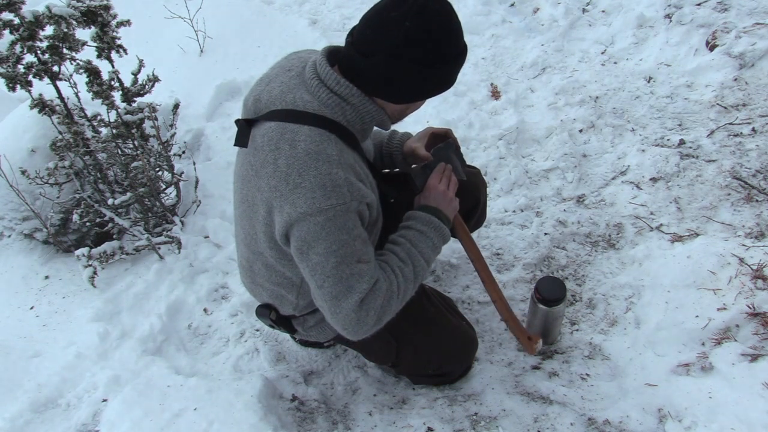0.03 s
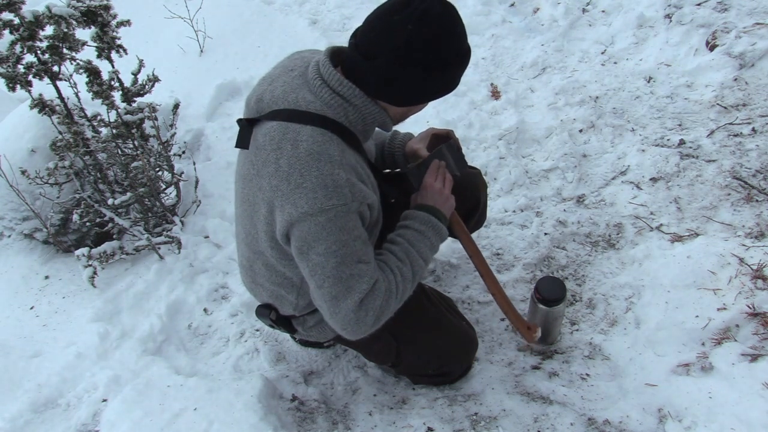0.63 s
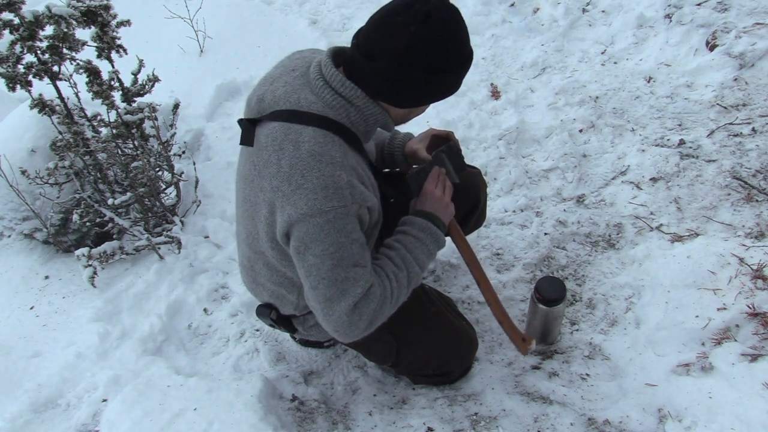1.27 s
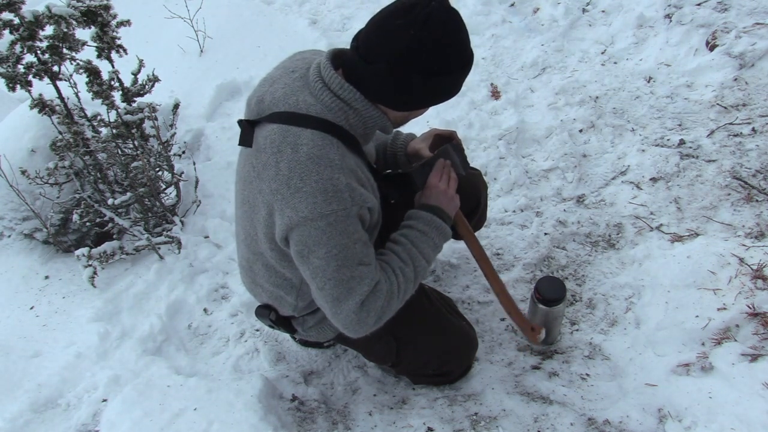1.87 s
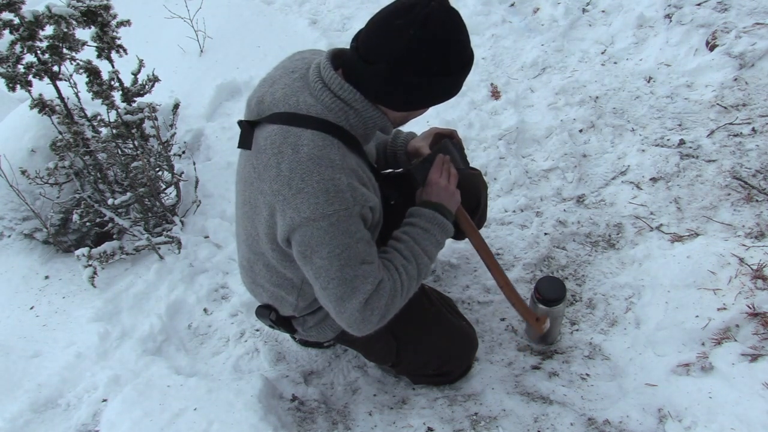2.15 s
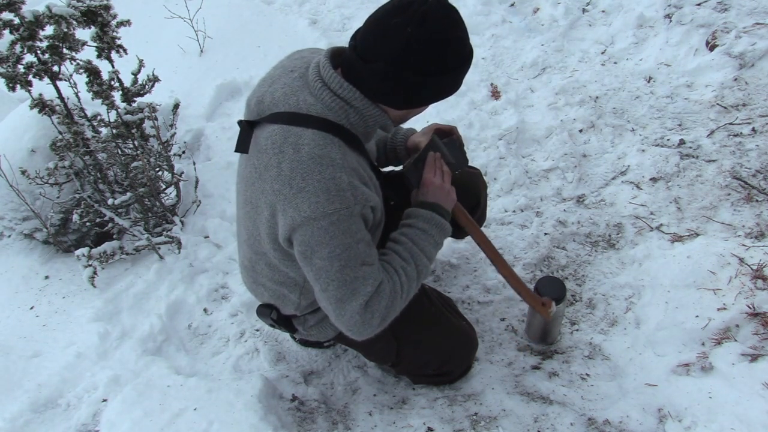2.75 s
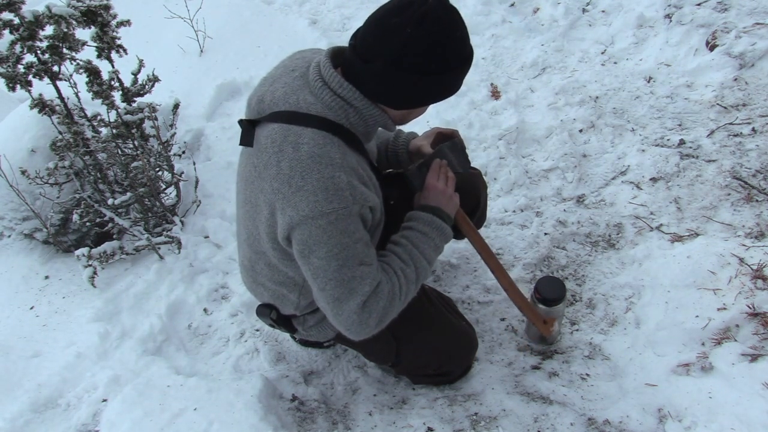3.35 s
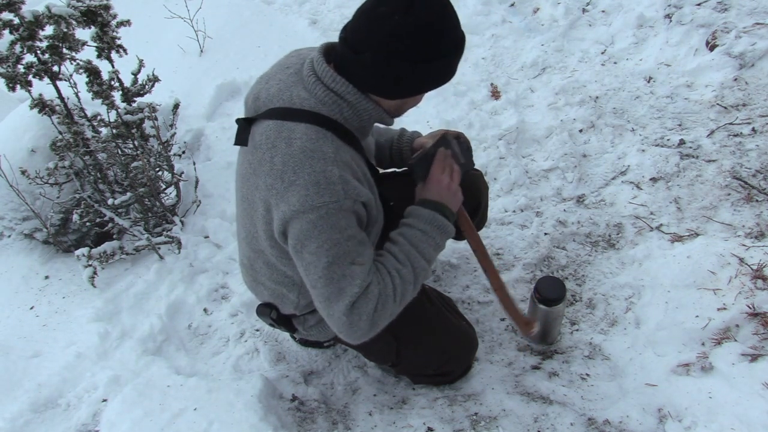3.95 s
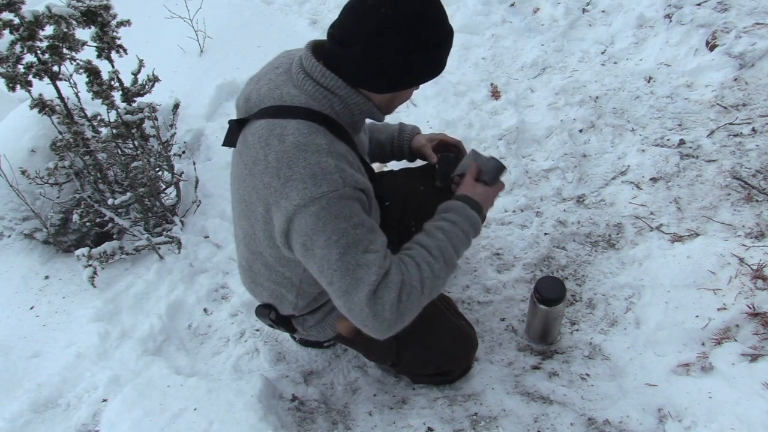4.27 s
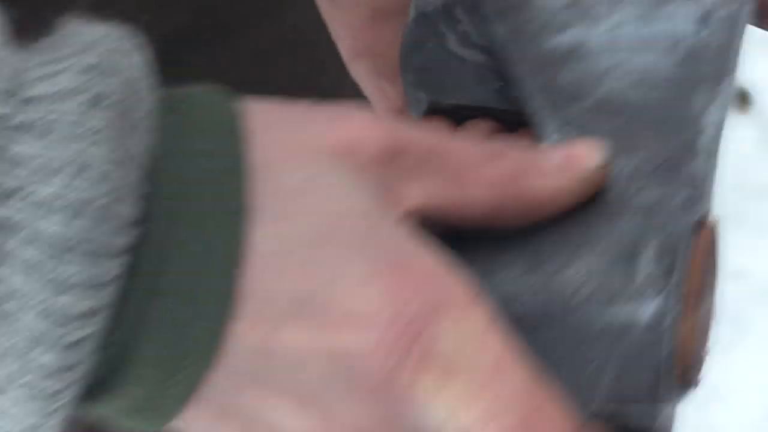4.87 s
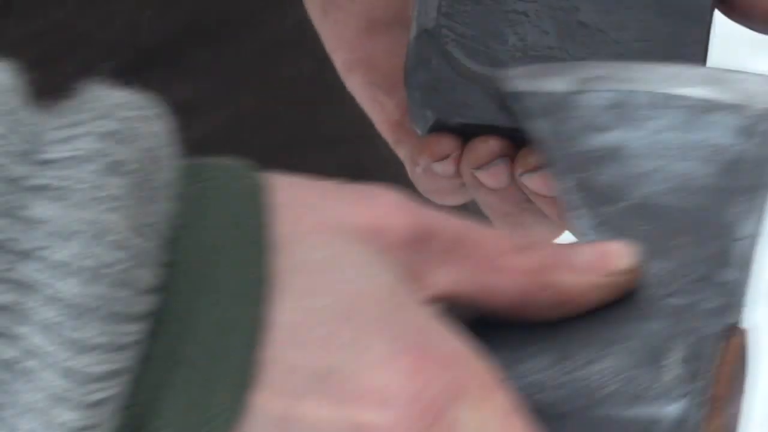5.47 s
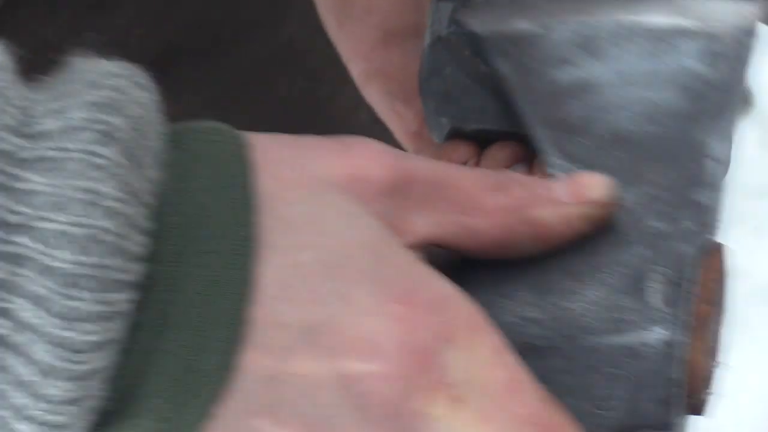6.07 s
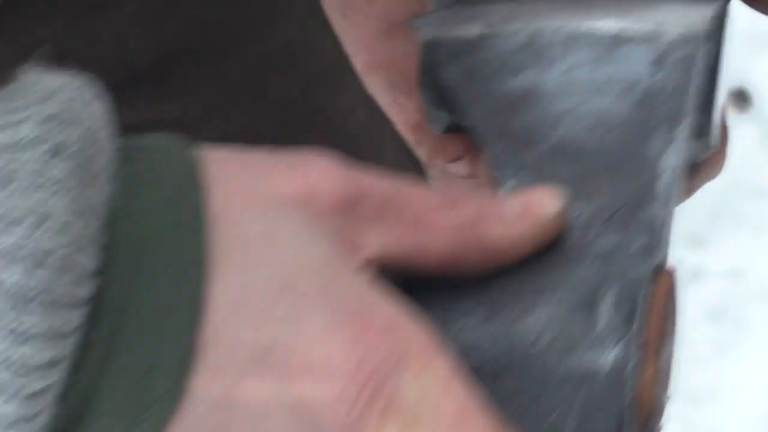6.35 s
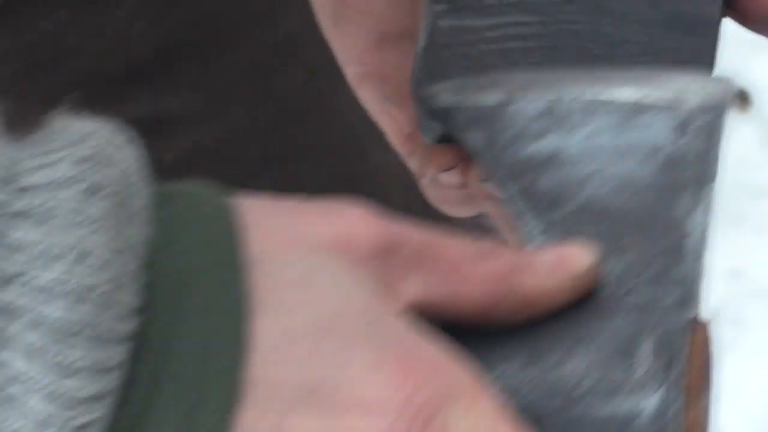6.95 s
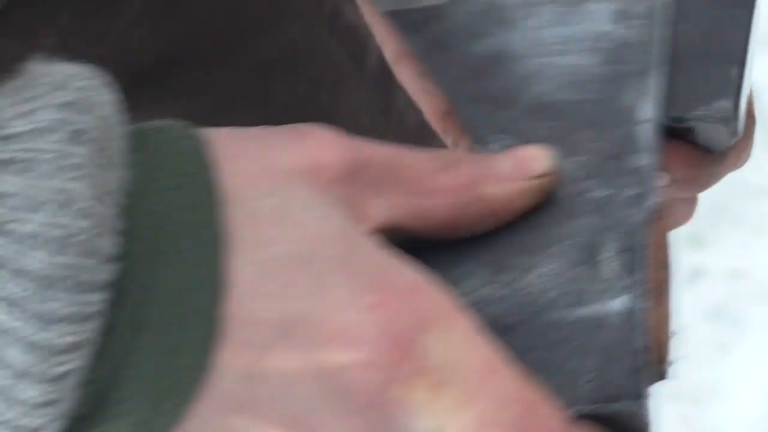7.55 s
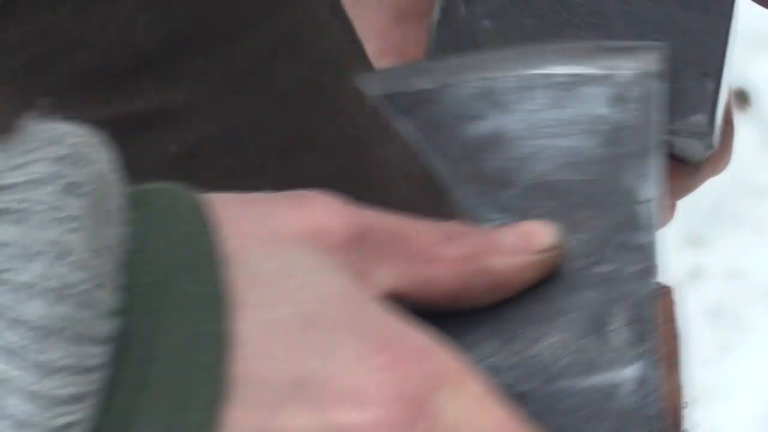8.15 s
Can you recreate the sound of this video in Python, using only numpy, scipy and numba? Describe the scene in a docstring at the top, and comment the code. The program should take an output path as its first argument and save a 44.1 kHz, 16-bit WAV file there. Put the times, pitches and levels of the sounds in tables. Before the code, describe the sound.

In quiet, snowy open air, an axe is honed close to the microphone. A stone rasps back and forth over the steel in a fast, even rhythm, with grains sometimes catching on the edge. The scraping stops with a small metallic ring, followed by a soft cloth rustle and a few light finger taps. Then a second run of rapid scraping begins, slightly different in tone, and continues to the end.

```python
"""In still, snowy air a kneeling man hones an axe with a small stone, pushing and pulling it in flat
circles at about eight strokes a second. Grit catches on the bevel and shakes the steel head, whose
tones are damped and bent by the stone pressed on it. Near 3.9 s the stone lifts off and the head rings.
The axe is turned over with a rustle and a few finger taps. From about 4.6 s the other face is honed."""
import sys
import numpy as np
from scipy import signal
from scipy.fft import rfft, irfft, next_fast_len
from scipy.io import wavfile
from numba import njit

SR = 44100
rng = np.random.default_rng(int(sys.argv[2]) if len(sys.argv) > 2 else 0)


def to_wav(s):
    """Save 16-bit WAV."""
    ch = np.atleast_2d(s).T  # columns
    pcm = np.round(np.clip(ch, -1, 1) * 32767)  # PCM
    wavfile.write(sys.argv[1], SR, pcm.astype(np.int16))


N = 362493
TIME = np.arange(N) / SR

# Strokes on each face, push and pull in turn. "Place" is where the stone sits across the bevel.
# (middle time [s], relative level [dB], swell length [s], place [-1..1])
FIRST_FACE_STROKES = [(.055, -33.5, 0.053, 0.34), (.168, -35.5, 0.058, -0.31), (.341, -32.5, 0.07, 0.24),
                      (.465, -37, .06, -0.3), (.607, -32.5, 0.059, 0.28), (.719, -37, 0.077, -0.31),
                      (.885, -34, 0.073, 0.29), (1.008, -37.5, 0.063, -0.39), (1.14, -35, 0.067, 0.34),
                      (1.253, -36, 0.044, -0.39), (1.386, -37, 0.06, -0.12), (1.523, -38.5, 0.088, -0.14),
                      (1.654, -35.5, 0.053, -0.056), (1.776, -34.5, 0.05, -0.063),
                      (1.906, -39, 0.064, -0.32), (2.029, -39, .064, -0.063), (2.166, -35.5, .058, -0.31),
                      (2.302, -34.5, 0.057, 0.055), (2.424, -35, 0.04, -0.17), (2.554, -37, 0.06, -0.018),
                      (2.672, -37, 0.061, -0.24), (2.801, -32.5, .045, 0.14), (2.926, -39, 0.051, -0.077),
                      (3.055, -35, 0.058, 0.15), (3.169, -36, 0.046, -0.28), (3.311, -32.5, 0.051, 0.072),
                      (3.436, -35, 0.059, -0.28), (3.566, -33.5, 0.03, 0.13), (3.68, -38.5, 0.061, -0.21),
                      (3.848, -34, 0.079, -0.043)]
SECOND_FACE_STROKES = [(4.66, -40, 0.15, -0.49), (4.785, -41, 0.035, 0.62), (4.878, -42.5, 0.047, -0.6),
                       (5.005, -39, 0.13, 0.73), (5.148, -38, 0.043, -0.79), (5.265, -39, 0.051, -0.14),
                       (5.39, -45, .04, -0.071), (5.495, -38.5, 0.16, 0.42), (5.64, -41.5, .042, -.5),
                       (5.752, -38, 0.11, 0.27), (5.88, -41, 0.035, -0.6), (5.98, -38, 0.13, 0.28),
                       (6.137, -39, 0.074, -0.33), (6.245, -36.5, 0.11, 0.19), (6.378, -37, 0.082, -0.042),
                       (6.493, -34, 0.084, -0.079), (6.615, -36, 0.063, -.05), (6.728, -35, 0.062, 0.099),
                       (6.863, -32.5, 0.094, -0.052), (7.005, -37, 0.091, -0.08),
                       (7.126, -32.5, 0.075, 0.032), (7.255, -37, 0.057, 0.013),
                       (7.374, -32.5, 0.059, 0.34), (7.499, -34.5, 0.067, -0.047),
                       (7.614, -32.5, 0.039, 0.4), (7.744, -35.5, 0.097, 0.12), (7.863, -36, 0.047, 0.45),
                       (7.985, -38, 0.1, -0.032), (8.118, -40.5, 0.26, 0.53), (8.218, -36, 0.048, -0.19)]
# Tones of the head under the stone: (pitch [Hz], width [Hz], gain [dB], gain per unit of place [dB],
# gain along the edge [dB], bend per unit of place [log ratio], bend along the edge [log ratio])
FIRST_HEAD_TONES = [(416, 110, -26.5, -2, -7.5, 0.066, -0.043), (1051.4, 63, -14.5, 1, 4, 0.073, 0.037),
                    (1230, 1600, -16.5, 0, -1.5, -0.18, 0.12), (1877, 146, -15, -14, 1, 0.0097, -0.0045),
                    (2248, 82, -10.5, 8.5, -3.5, -0.19, 0.0049), (2780, 190, -12, 13, 6, 0.19, 0.01),
                    (3233, 394, -0.5, 15, -3, -0.021, -0.028), (3563, 385, -7.5, 20, -3.5, -0.07, 0.08),
                    (4190, 320, -21.5, 17, 8.5, -0.055, 0.0078), (5380, 570, -28, -1, 13.5, -0.016, 0.057),
                    (5980, 260, -15, -4.5, -6, 0.064, -0.02), (6410, 350, -15, -23.5, -5.5, -0.15, -0.014),
                    (7830, 710, -19, 7, -2.7, -0.033, -0.036), (10870, 1100, -24, -6, -18.5, 0.023, -0.11),
                    (11000, 11700, -27, 7, 10, -0.3, -0.051), (12700, 770, -30, 2, -2, -0.029, -0.058)]
SECOND_HEAD_TONES = [(440, 430, -35, -6.5, 4, -0.01, 0.091), (1102, 107, -7, -5, -10, 0.0092, -0.04),
                     (1372, 270, -18, 1, -14, -0.063, 0.079), (1997, 148, -4.5, -5, -9, 0.014, -0.091),
                     (2071, 240, -2, 1, -6, -0.048, 0.088), (2733, 410, 0, -7.5, -10.5, -0.036, -0.04),
                     (3166, 590, -17.5, 12, 13.5, 0.037, 0.03), (3582, 127, -19, 19, 12.5, 0.011, -0.0024),
                     (3857, 205.0, -16, 16, 2, 0.023, 0.011), (4424, 590, -11.5, 9, -12, 0.008, -0.037),
                     (6050, 860, -14.5, 5, 1, -0.056, -0.082), (7010, 270, -23, -11, 4.5, 0.043, -0.11),
                     (7420, 790, -15.5, 1, -5, 0.072, 0.047), (11000, 7400, -16.5, 6, -6.5, -0.19, 0.11),
                     (13350, 1100, -23.5, 3, -11, 0.06, -0.095)]
# Whines that swell and glide as the stone slides out and back; a cycle runs from mid-push to mid-push.
# (pitch [Hz], width [Hz], gain [dB], gain along the edge [dB], bend along the edge [log ratio],
# pitch swing [log ratio], highest at [cycles], swell [dB], loudest at [cycles])
FIRST_FACE_WHINES = [(2506, 110, -13.5, 2, -0.033, 0.046, 0.28, 6.5, 0.69),
                     (2213, 91, -11.5, -23, 0, 0.028, .05, 7.5, 0.0195),
                     (2758, 100, -16, 3.5, -0.0011, .085, .3, 8, 0.52),
                     (530.5, 34, -26.5, 2.5, -0.0082, 0.017, 0.24, 1.5, .45),
                     (5950, 160, -30, 6, -.04, .025, 0.91, 4, 0.29),
                     (6600, 93, -18, -6, -.005, 0.022, 0.24, 5, 0.3),
                     (7810, 140, -21, 2, -0.0032, .02, 0.89, 2, 1),
                     (10820, 180, -28, -1.5, -.07, .03, 0.98, 3.5, 0.098),
                     (12750, 250, -30.5, 2, -0.036, 0.032, 0.88, 0, 0.99)]
SECOND_FACE_WHINES = [(1065, 65, -31.5, 14.5, -0.033, .02, 0.23, 7.9, 0.032),
                      (2736, 84, -5, -7.5, 0.0031, .01, 0.48, 2.6, 0.88),
                      (2557, 90, -22, 17.5, 0.115, 0.06, 0.253, 6.4, 0.58),
                      (3984, 190, -16.5, -8, .02, .03, .55, 5, 0.33),
                      (5940, 220, -23, 9.5, 0.049, 0.042, 0.554, 3.8, 0.64),
                      (6990, 170, -18, -16, 0.0055, 0.023, .35, 6.1, 0.6),
                      (7760, 200, -38.5, 15, 0.032, 0.04, 0.07, 4, 0.21),
                      (10800, 300, -35, 5.5, 0, 0.031, 0.79, 6.5, 0.57),
                      (13330, 450, -26.5, -5, -.07, .03, 0.88, 4, 0.6)]
# How the stone is held: (time [s], circle radius [units of place], stone pitch [Hz],
# pitch swing [log ratio], gain on pushes [dB], gain on pulls [dB])
FIRST_FACE_GRIP = [(0, 0.11, 628, 0.21, -19.5, -14), (1.0, 0.08, 634, 0.13, -17, -13.5),
                   (2.0, 0.01, 597, 0.27, -21.5, -12), (2.8, 0.05, 526, 0.19, -22.5, -11.5),
                   (3.55, 0.09, 520, .3, -23, -9.5), (3.86, 0.6, 430, 0.28, -29, -11.5)]
SECOND_FACE_GRIP = [(4.63, .25, 464, 0.24, -13.5, -26.5), (5.9, 0.18, 470, .24, -14.5, -26.5),
                    (6.4, .1, 582, .14, -26, -27), (7.0, 0.25, 730, 0.19, -25.5, -25),
                    (7.5, 0.18, 860, 0.15, -25, -18), (8.2, 0.19, 700, 0.15, -24.5, -17)]
# Coarse grains snag on the edge: (time [s], extra force [dB])
GRAIN_SNAGS = [(.043, 2), (0.309, 4), (0.409, 5), (.602, 1), (0.88, 2), (1.134, 5.5), (1.493, 7),
               (2.776, 4), (3.181, 3), (3.246, 10.5), (3.289, 8.5), (3.501, 13), (3.521, 10.5),
               (3.756, 5.5), (4.953, 0), (6.998, 2.5)]
# The stone loses its bite for a moment: (time [s], loss [dB])
STONE_SKIPS = [(2.762, -0.5), (3.23, -1), (3.274, 2), (3.488, 5), (3.737, 6.5), (5.088, 8.5), (5.333, 7.5),
               (5.828, 7), (6.785, 3), (6.95, 8), (7.136, 5.5), (7.436, 8.5), (7.679, 5)]
# The stone drags at the end of a stroke: (time [s], relative level [dB], pitch [Hz])
STONE_DRAGS = [(0.18, -42.5, 1520), (0.71, -46.5, 1390), (1.41, -49, 1400), (1.65, -38.5, 1400),
               (1.91, -53, 1400), (2.17, -44, 1300), (2.425, -46, 1308), (2.69, -47, 1370),
               (3.2, -46, 1396), (3.46, -40.5, 1300), (3.71, -49, 1300), (3.77, -42.5, 1950)]
# Tones of the head ringing free: (pitch [Hz], level [dB], time to fade by 60 dB [s])
FREE_HEAD_TONES = [(334, -54, 0.33), (1050, -46.5, 0.1), (1810, -38.5, 0.081), (2640, -44, 0.11),
                   (3100, -32.5, .05), (6420, -47, 0.11)]
# Sleeves rub as the axe is turned: (time [s], level [dB])
RUSTLE_LEVELS = [(3.95, -99), (4.09, -77), (4.14, -71), (4.28, -68.5), (4.34, -61.5), (4.37, -68),
                 (4.43, -67), (4.47, -61.5), (4.53, -66.5), (4.59, -72), (4.66, -59), (4.9, -72)]
# The tone colour of rubbing cloth: (frequency [Hz], relative level [dB])
CLOTH_COLOUR = [(120, -38), (200, -4), (248, -18), (320, -9), (383, -8.5), (734, -9.5), (1570, -9.5),
                (3350, -4), (4810, -17.5), (15000, -37)]
# Fingers bump the axe: (time [s], level [dB], pitch [Hz], width [Hz], time to fade by 60 dB [s])
FINGER_TAPS = [(4.175, -68, 1050, 200, .1), (4.229, -64, 3500, 4000, .04), (4.241, -58, 170, 300, 0.054),
               (4.393, -53.5, 2800, 4000, 0.027), (4.456, -50, 1010, 900, 0.035),
               (4.471, -65, 1800, 3000, .03), (4.541, -59, 3500, 4000, .03), (5.298, -59, 105, 160, .14),
               (5.389, -69, 75, 90, .2), (6.26, -60, 140, 130, .08)]
# The tone colour of the still air: (frequency [Hz], relative level [dB])
AIR_COLOUR = [(12, -32), (20, -3), (256, -11.5), (421, -17.5), (1020, -15), (2280, -21), (2690, -24),
              (2930, -32), (3180, -13), (4560, -24), (15000, -26.5)]

FIRST_CONTACT_S, SECOND_CONTACT_S = (0.0, 3.887), (4.632, 8.23)   # the stone lands, the stone leaves
LIFT_OFF_S = 3.889


def hone(motion, contact, tones, whines, impacts, stone_width_hz, release_s, wobble, tilt_db,
         overhang_hz):
    """Grit shakes the stone and the head; where they touch sets each tone's strength and pitch."""
    cycle, level_db, place, stone_hz, stone_db = motion
    start, end = contact
    touch = np.clip((TIME - start) / release_s + .5, 0, 1) * np.clip((end - TIME) / release_s + 1, 0, 1)
    out = resonate(strike(touch * impacts) * from_db(stone_db), stone_hz, stone_width_hz)   # the stone
    live = (TIME > start - .05) & (TIME < end + .1)
    along = (TIME[live] - start) / (end - start)   # the hand works its way along the edge, 0 to 1
    force = (touch * impacts * from_db(level_db))[live]
    place, cycle = place[live], cycle[live]
    crossing_s = np.exp(-.04 * wave(cycle, .9) - 0.096 * drift(13)[live]) / overhang_hz
    for hz, width, db, place_db, along_db, place_bend, along_bend in tones:
        rocking_db = tilt_db * drift(8.9)[live]
        drive = strike(force) * from_db(db + place_db * place + along_db * along + rocking_db)
        if width > 2000:
            # Broad hiss crosses the stone and returns, cancelling pitches that move with the overhang.
            drive = (drive + np.interp(TIME[live] - crossing_s, TIME[live], drive)) / np.sqrt(2)
        out[live] += resonate(drive, hz * np.exp(place_bend * place + along_bend * along), width)
    for hz, width, db, along_db, along_bend, swing, highest, swell_db, loudest in whines:
        gain = from_db(db + along_db * along + swell_db * wave(cycle, loudest))
        bend = along_bend * along + swing * wave(cycle, highest) + wobble * drift(5.2)[live]
        out[live] += resonate(strike(force) * gain, hz * np.exp(bend), width)
    return out


def hand(strokes, grip, steepness, ease_db, ease_at, stall_db, highest_at):
    """The stone goes round in flat circles; its tone glides with the overhang and fades at each turn."""
    cycle = stroke_cycle(strokes)
    level_db = scrape_level(strokes, cycle, steepness, ease_db, ease_at)
    radius, middle_hz, swing, push_db, pull_db = in_time(grip)
    times, _, _, places = np.transpose(strokes)
    reach = np.sin(2 * np.pi * cycle)
    pushing = np.cos(np.pi * cycle) ** 2
    place = np.interp(TIME, times, places) + radius * reach
    stone_hz = middle_hz * np.exp(swing * wave(cycle, highest_at))
    stone_db = level_db + pushing * push_db + (1 - pushing) * pull_db - stall_db * reach ** 4
    return cycle, level_db, place, stone_hz, stone_db


def stroke_cycle(strokes):
    """Count the hand's circles so far: a whole number at mid-push, a half at mid-pull."""
    times = np.array(strokes)[:, 0]
    times = np.r_[2 * times[0] - times[1], times, 2 * times[-1] - times[-2]]   # extend both ends
    return np.interp(TIME, times, (np.arange(len(times)) - 1) / 2)


def scrape_level(strokes, cycle, steepness, ease_db, ease_at, skip_s=0.013):
    """Each stroke swells and fades; the hand eases off once a circle, and the stone sometimes skips."""
    times = TIME[::40]
    power = sum(from_db(db) ** 2 / (1 + ((times - at) / length_s) ** 2) ** steepness
                for at, db, length_s, _ in strokes)
    lost_db = sum(db * np.exp(-((times - at) / skip_s) ** 2) for at, db in STONE_SKIPS)
    easing = np.cos(np.pi * (cycle - ease_at)) ** 16
    return np.interp(TIME, times, 10 * np.log10(power) - lost_db) - ease_db * easing


def grit(per_s, size_db, judder_db, judder_hz, sway_db):
    """Tiny grains hit at random times, harder and softer as the stone sticks and slips."""
    sizes = from_db(size_db * np.minimum(rng.exponential(1, N), 5))
    clumps = from_db(judder_db * drift(judder_hz) + sway_db * drift(12.2))
    hits = rng.random(N) < per_s / SR
    return unit_level(hits * sizes * clumps)


def snags(length_s, skate_share=0.21, skate_s=0.015):
    """The stone skates lightly, then a grain catches: the force jumps and soon eases."""
    force_db = np.zeros(N)
    for at, db in GRAIN_SNAGS:
        gap = np.abs(TIME - at)
        force_db += db * np.where(TIME >= at, np.exp(-gap / length_s), -skate_share * np.exp(-gap / skate_s))
    return from_db(force_db)


def drags(impacts, width_hz, length_s):
    """The stone drags with a short, dull rasp where a stroke runs out."""
    swell = sum(from_db(db) * np.exp(-((TIME - at) / length_s) ** 2) for at, db, _ in STONE_DRAGS)
    _, pitch_hz = in_time(STONE_DRAGS)
    return resonate(strike(impacts * swell), pitch_hz, width_hz)


def body_echo(sound, delay_s, echo_db):
    """One quick echo comes off the man's body; the snow returns nothing."""
    gain = from_db(echo_db)
    echo = gain * np.interp(TIME - delay_s, TIME, sound, left=0)
    return (sound + echo) / np.sqrt(1 + gain ** 2)


def free_ring(slip_s):
    """The head rings on as the stone slips off the edge."""
    click = signal.unit_impulse(N, round(LIFT_OFF_S * SR))
    swell = np.clip((TIME - LIFT_OFF_S) / slip_s, 0, 1)
    return swell * sum(from_db(db) * ring(click, hz, fade_s) for hz, db, fade_s in FREE_HEAD_TONES)


def handle_hum(hz, fade_s, gain_db, growth_db):
    """While the handle hangs free, the first strokes make the whole axe bend and hum."""
    stroke_db = in_time(FIRST_FACE_STROKES)[0]
    force = from_db(stroke_db + growth_db * (TIME / LIFT_OFF_S - 1.5)) * (TIME < LIFT_OFF_S)
    build_up = np.sqrt(fade_s * SR / (4 * np.log(1000)))   # how much the ringing boosts noise
    return from_db(gain_db) * ring(strike(force), hz, fade_s) / build_up


def handling():
    """Sleeves rub with a fluttering hiss, and fingers tap on the axe."""
    flutter = unit_level(from_db(2.2 * drift(90)))
    out = from_db(in_time(RUSTLE_LEVELS)[0]) * shaped_noise(CLOTH_COLOUR) * flutter
    age = np.arange(SR // 8) / SR
    for at, db, hz, width, fade_s in FINGER_TAPS:
        start = round(at * SR)
        out[start:start + len(age)] += resonate(strike(from_db(db - 60 * age / fade_s)), hz, width)
    return out


def still_air(level_db):
    """A faint, steady hush lies behind everything."""
    return from_db(level_db) * shaped_noise(AIR_COLOUR)


def strike(impacts):
    """Give every hit a random strength and direction."""
    return impacts * rng.standard_normal(len(impacts))


def resonate(sound, hz, width_hz):
    """Keep a band around one pitch; white noise comes out as strong as it went in."""
    angle = 2 * np.pi * np.clip(hz, 20, .42 * SR) / SR * np.ones(len(sound))
    tuning = np.tan(angle / 2)
    damping = 2 * np.pi * width_hz / SR / np.sin(angle)
    once = band_pass(sound + 1e-18, tuning, damping)
    return band_pass(once, tuning, damping) * np.sqrt(2 * SR / (np.pi * width_hz))


@njit
def band_pass(sound, tuning, damping):
    """A ringing filter whose pitch may move at every sample."""
    out, band, low = np.zeros(len(sound)), 0., 0.
    for i in range(len(sound)):
        step = tuning[i]
        passed = (band + step * (sound[i] - low)) / (1 + step * (step + damping[i]))
        band, low = 2 * passed - band, low + 2 * step * passed
        out[i] = damping[i] * passed
    return out


def ring(force, hz, fade_s):
    """Each click starts a pure tone that falls by 60 dB in fade_s."""
    decay, angle = from_db(-60 / (fade_s * SR)), 2 * np.pi * hz / SR
    return signal.lfilter([0, np.sin(angle)], [1, -2 * decay * np.cos(angle), decay ** 2], force + 1e-18)


def shaped_noise(colour):
    """Noise with a given tone colour and an average level of 1."""
    hz, db = np.transpose(colour)
    size = next_fast_len(N)
    log_hz = np.log(np.maximum(np.fft.rfftfreq(size, 1 / SR), 1))
    gain = from_db(np.interp(log_hz, np.log(hz), db))
    return unit_level(irfft(rfft(rng.standard_normal(size)) * gain)[:N])


def drift(rate_hz):
    """A smooth random wander, about 1 in size."""
    decay = np.exp(-2 * np.pi * rate_hz / SR)
    return unit_level(signal.lfilter([1], [1, -2 * decay, decay ** 2], rng.standard_normal(N + SR))[SR:])


def wave(cycle, peak_at):
    """Rise and fall once in each circle of the hand."""
    return np.cos(2 * np.pi * (cycle - peak_at))


def in_time(rows):
    """Join each column's values by straight lines through time."""
    times, *columns = np.transpose(rows)
    return [np.interp(TIME, times, column) for column in columns]


def from_db(db):
    """Turn decibels into a multiplier."""
    return 10 ** (np.asarray(db) / 20)


def unit_level(sound):
    """Scale to an average (rms) level of 1."""
    return sound / np.sqrt(np.mean(sound ** 2) + 1e-20)


def scene():
    """Hone one face, turn the axe, hone the other; one channel."""
    surge = snags(length_s=0.0076)
    first_grit = surge * grit(per_s=11000, size_db=1.5, judder_db=1.5, judder_hz=210, sway_db=0.76)
    second_grit = surge * grit(per_s=11000, size_db=1.5, judder_db=1.5, judder_hz=260, sway_db=1.03)
    motion = hand(FIRST_FACE_STROKES, FIRST_FACE_GRIP,
                  steepness=2.99, ease_db=1.5, ease_at=0.5, stall_db=17.5, highest_at=0.26)
    first = hone(motion, FIRST_CONTACT_S, FIRST_HEAD_TONES, FIRST_FACE_WHINES, first_grit,
                 stone_width_hz=160, release_s=0.0027, wobble=0.016, tilt_db=1.66, overhang_hz=2570)
    first += drags(first_grit, width_hz=1430, length_s=0.018)
    motion = hand(SECOND_FACE_STROKES, SECOND_FACE_GRIP,
                  steepness=2.67, ease_db=0.5, ease_at=0.67, stall_db=2, highest_at=0.4)
    second = hone(motion, SECOND_CONTACT_S, SECOND_HEAD_TONES, SECOND_FACE_WHINES, second_grit,
                  stone_width_hz=157, release_s=0.013, wobble=0.013, tilt_db=2.06, overhang_hz=2130)
    axe = from_db(-0.4) * body_echo(first, delay_s=0.0051, echo_db=-11.0)
    axe += from_db(-0.13) * body_echo(second, delay_s=0.004, echo_db=-9.5)
    bass_cut = signal.butter(8, 280, "high", fs=SR, output="sos")   # so small a head gives off no bass
    axe = signal.sosfilt(bass_cut, axe) + free_ring(slip_s=0.0015)
    axe += handle_hum(hz=322.4, fade_s=0.52, gain_db=-29, growth_db=5)
    return (axe + handling() + still_air(level_db=-72))[None]


def record(dry):
    """Cut the treble steeply above 15750 Hz."""
    return signal.sosfilt(signal.ellip(10, .2, 70, 15750, fs=SR, output="sos"), dry)


dry = scene()
out = record(dry)
to_wav(out)
```